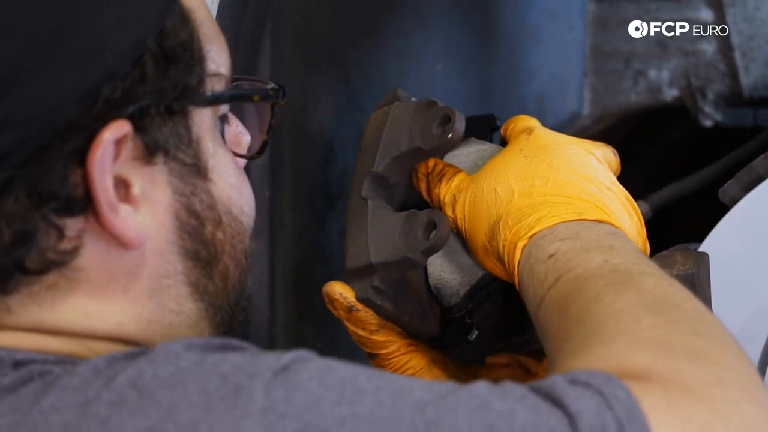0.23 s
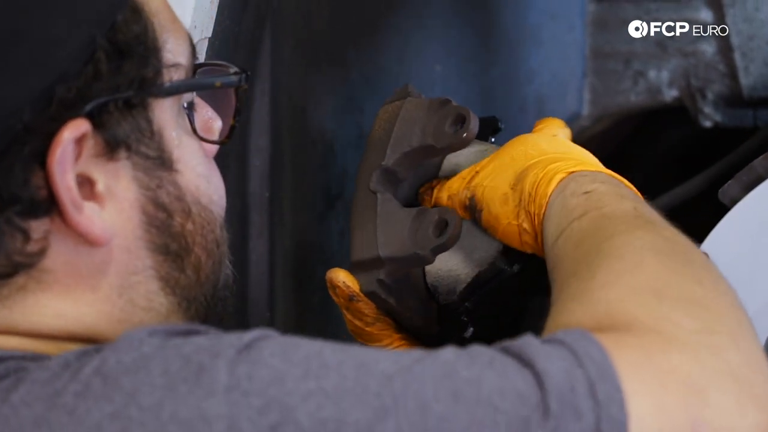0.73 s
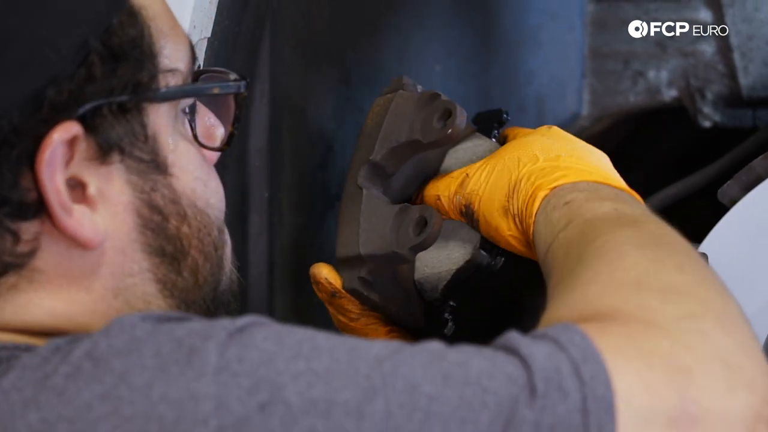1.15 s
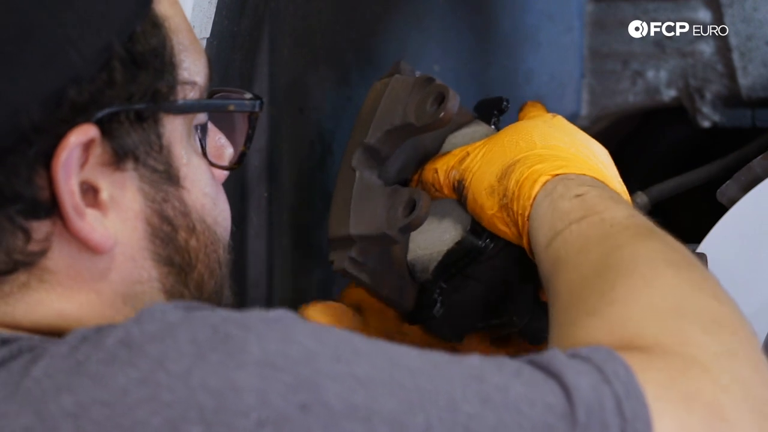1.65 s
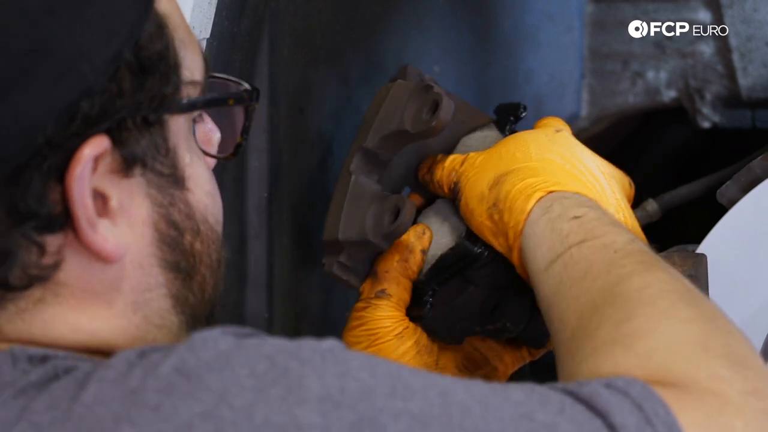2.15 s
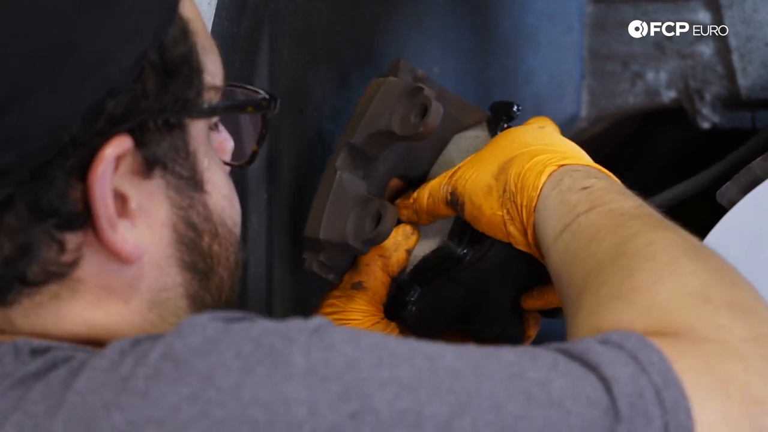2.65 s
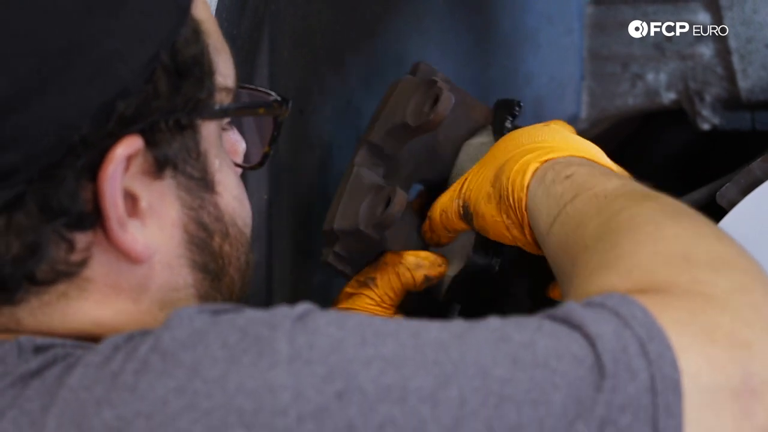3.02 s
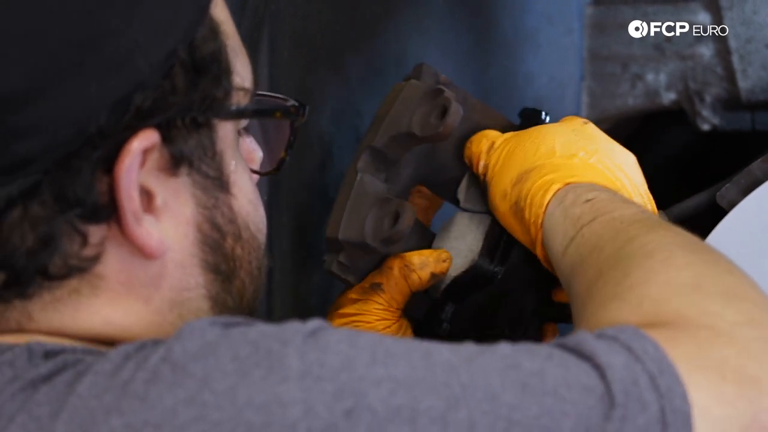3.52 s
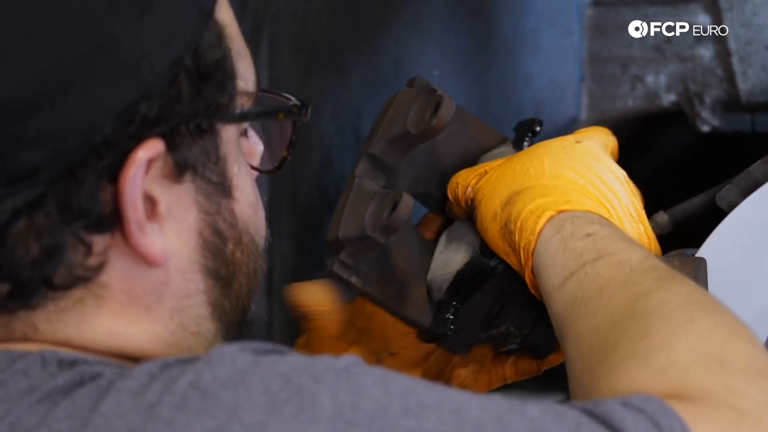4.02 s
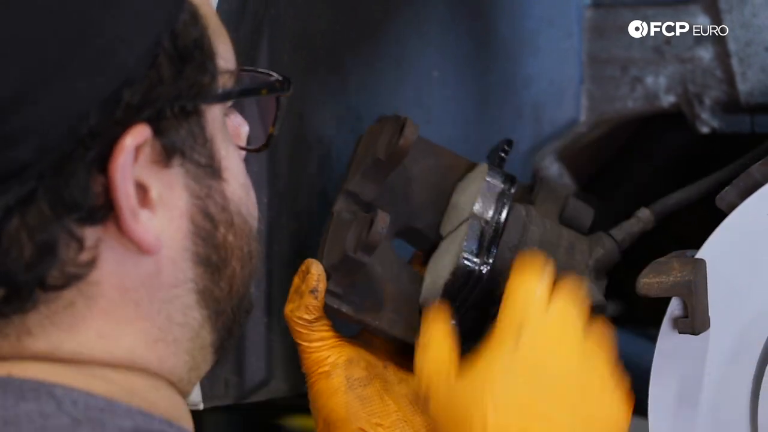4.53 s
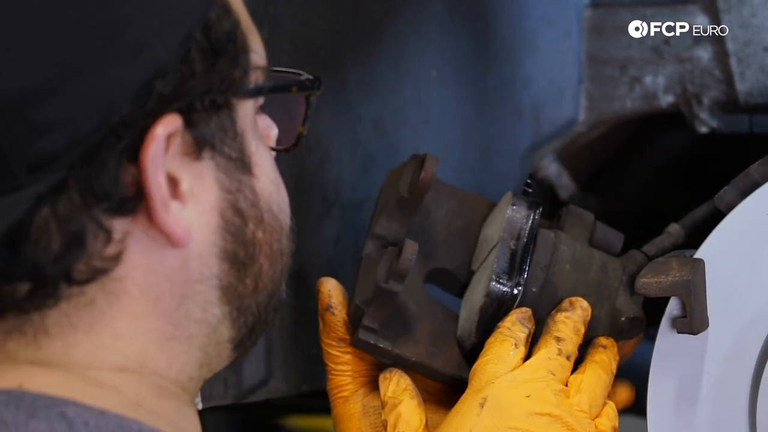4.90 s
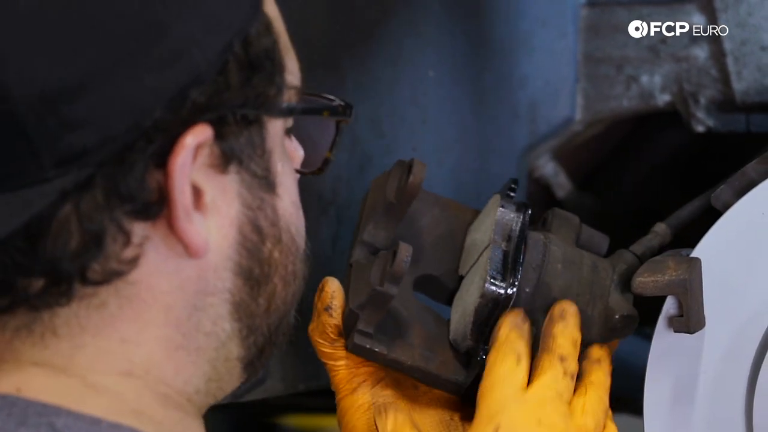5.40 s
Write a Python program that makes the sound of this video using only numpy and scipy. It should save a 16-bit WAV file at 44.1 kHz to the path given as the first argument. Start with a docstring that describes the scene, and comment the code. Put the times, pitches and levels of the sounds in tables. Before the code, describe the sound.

Gloved hands fit a brake pad into a caliper, heard close and mostly dry. Opening double clack, faint ticks, a short fading rattle, scrapey knocks, then a very loud sharp snap and a second, duller one. Afterwards faint glove rustle and small clicks over a very low rumble and soft room noise.

```python
"""Brake pad into a caliper, quiet garage

Gloved hands work a steel brake pad into a cast caliper; the work sounds close, the garage faint around it.
The backing plate knocks and chatters on the casting and the spring clip snaps home twice: bursts of
micro-bounces strike decaying modes. Gloves and metal rub in short strokes of filtered grit; bumps are low
decaying sines. Shaped noise gives a low rumble and room noise, and a low sine climbs, holds and sinks."""
import sys
import numpy as np
from scipy import signal
from scipy.fft import rfft, irfft, next_fast_len
from scipy.io import wavfile

SR = 44100
rng = np.random.default_rng(int(sys.argv[2]) if len(sys.argv) > 2 else 0)


def transcribe(signal):
    """Save signal, clipped to [-1, 1], as a 16-bit WAV file at the path in sys.argv[1]."""
    frames = np.atleast_2d(signal).T
    limited = np.clip(frames, -1, 1)
    pcm = np.round(limited * 32767).astype(np.int16)
    wavfile.write(sys.argv[1], SR, pcm)


N = 249561

# room background: t/s, rumble level/dB, room noise level/dB
BACKGROUND = [(0.0, -67, -62.5), (0.31, -63.5, -72), (1.0, -70, -68.5), (1.37, -67, -71.5),
              (1.69, -64, -69), (2.13, -63, -67.5), (2.6, -71.5, -70), (3.04, -64.5, -70.5),
              (3.17, -82.5, -91.5), (3.39, -78.5, -76.5), (3.7, -78.5, -80.5), (3.86, -69.5, -72.5),
              (4.4, -66, -72.5), (5.03, -72.5, -73.5), (5.3, -75, -82), (5.66, -86, -88)]
# spectrum of the low rumble: f/Hz, relative level per Hz/dB
RUMBLE_SPECTRUM = [(12, -56), (20, -34), (27, -24), (35, -14.5), (46, -10), (75, -1), (95, 0), (156, -10),
                   (220, -33), (290, -45), (480, -120)]
# spectrum of the room noise: f/Hz, relative level per Hz/dB
ROOM_NOISE_SPECTRUM = [(88, -33.5), (150, -4.5), (259, -3.5), (361, -1.5), (649, -7), (821, -14),
                       (1080, -10), (1870, -16.5), (6510, -29), (14000, -24.5), (16000, -33)]
# faint narrow hisses: f/Hz, level over the room noise/dB
AIRY_BANDS = [(2000, -20.5), (3280, -27)]
# a low tone, perhaps a distant engine: t/s, f/Hz, level/dB
HUM = [(0, 54.9, -79), (.8, 56.6, -74), (1.5, 63.26, -69), (1.95, 71.4, -72), (2.25, 84.1, -62.5),
       (2.5, 86.1, -63.5), (2.92, 86.6, -58.5), (3.04, 87.1, -77), (3.8, 78.86, -79), (4.45, 67.3, -61.5),
       (5.0, 64.83, -80.5), (5.66, 61.84, -94)]
# metal on metal: t/s, plate peak level/dB, casting f/Hz, casting peak level/dB, clip f/Hz, clip peak level/dB,
# edge peak level/dB, chatter decay/ms, slide-in/ms (below one slide step: none)
CONTACTS = [(0.002, -18.5, 1250, -28.5, 2790, -27, -21.5, 5.5, -2.5),
            (0.0388, -24.5, 1170, -32.5, 3510, -28, -24.5, 2.46, 0),
            (0.164, -62, 1270, -70, 2600, -39, -29.5, 3.6, 0),
            (0.452, -39.5, 1255, -44, 2640, -34, -38.5, 6.1, 0),
            (0.48, -49, 1060, -43.5, 2770, -47, -62, 5.5, 0),
            (0.521, -51, 1120, -55.5, 4470, -49.5, -50, 2.2, 0),
            (0.846, -56, 1030, -50, 3020, -54, -54, 0.96, 0),
            (0.867, -36.5, 1160, -40.5, 2950, -32.5, -47, 1.2, 0),
            (0.963, -70, 1130, -51, 2870, -70, -43, 2.1, 0),
            (1.001, -39.5, 1336, -46.5, 2930, -43, -51.5, 10.4, 0),
            (1.1175, -26.5, 1068, -40, 2760, -40, -35, 3.3, -2),
            (1.652, -49.5, 1310, -48.5, 3420, -46.5, -30.5, 3.8, 0),
            (1.772, -94, 900, -80, 3000, -57, -53, 3, 0),
            (1.879, -84, 1110, -80, 3260, -43.5, -49.5, 8.3, 0),
            (1.9495, -32, 1122, -30.5, 3620, -44.5, -69, 0.86, 11),
            (2.0785, -28, 1100, -40.5, 2850, -38, -32, 3.9, 9),
            (2.4495, -19, 874, -34.5, 3000, -32.5, -25.5, 6, 7),
            (3.0505, -4.5, 991, -15.5, 3515, -11.5, -8.5, 3, 13),
            (3.055, -13.5, 912, -12.5, 3454, -2, -18.5, 1.3, 0),
            (3.273, -51, 1009, -57, 3150, -66.5, -72, 2.6, -2.5),
            (3.461, -20, 924, -45, 2910, -39, -27, 2.8, 21),
            (3.469, -9, 618, -15.5, 4010, -11.5, -21.5, 3.5, -29),
            (4.055, -76, 550, -69, 2960, -43.5, -49, 2.1, 0.5),
            (4.345, -65, 1330, -76, 2637, -71, -45, 2.8, 0), (4.432, -69, 570, -71, 2813, -73, -43, 2.8, 0),
            (4.731, -68, 908, -66.5, 4376, -58, -47.5, 1.87, 0),
            (4.866, -67, 1090, -74, 3940, -73, -47.5, 4.4, 0),
            (5.089, -50, 1162, -72, 2720, -44, -54, 2.4, 0),
            (5.355, -67.5, 594, -85, 2710, -85, -90, 1.5, 0),
            (5.533, -70.5, 597.5, -70, 2584, -68, -81, 1, 0)]
# first touch of the loose pad rattling: plate peak level/dB, casting f/Hz, casting peak level/dB, clip f/Hz,
# clip peak level/dB, edge peak level/dB, chatter decay/ms
RATTLE = (-43, 1106, -44, 2692, -43, -54, 4.5)
# modes of the backing plate, held by the glove, one free mode ringing on: f/Hz, relative level/dB, t60/s
PLATE_MODES = [(1620, -9, 0.041), (1806.4, 0.5, 0.024), (1885, 8, 0.037), (2030, -2.5, 0.03),
               (2190, -1, 0.025), (2323, -8.5, 0.075), (1930, -34.5, 0.68)]
# modes of thin edges and clip fingers: f/Hz, relative level/dB, t60/s
EDGE_MODES = [(6730, -11, 0.01), (7600, -5.5, 0.0093), (8176, -4.5, 0.0053), (8750, 0.5, 0.0054),
              (9660, -3.5, .012), (10650, -6.5, 0.015), (11020, -8, .012), (12320, -3.5, 0.0068),
              (12460, 2, 0.0049), (13300, -4.5, 0.019), (12400, -4, 0.0048), (15100, -2.5, 0.016),
              (15550, -5.5, 0.0065), (14830, -3, .01)]
# modes around the casting's pitch: pitch ratio, relative level/dB, t60 in full ring/s
CASTING_MODES = [(1.0, -0.5, 0.067), (1.7, -5.5, 0.032), (1.01, -30, 0.22)]
CLIP_MODES = [(1.0, 5.5, 0.012), (1.12, -1, 0.011), (1.0, -27, 0.42), (1.15, -27, 0.17)]
# rubbing strokes: start t/s, length/ms, metal scrape level/dB, scrape f/Hz, glove rustle level/dB
STROKES = [(0.011, 75, -55.5, 1960, -52), (0.156, 47, -58, 2590, -43.5), (0.455, 170, -70, 3300, -57),
           (0.629, 158, -77, 3000, -58), (0.769, 110, -79.5, 2800, -69), (0.835, 103, -60.5, 2750, -45.5),
           (.925, 140, -76, 2630, -64), (1.119, 151, -69, 2560, -66.5), (1.231, 140, -92, 2100, -72),
           (1.371, 60, -91, 2500, -70), (1.631, 104, -65.5, 2300, -48.5), (1.64, 73, -60, 706, -80),
           (1.766, 102, -69, 2540, -61), (1.862, 106, -67, 3330, -59), (1.942, 144, -56, 3080, -49.5),
           (2.066, 74, -63.5, 2420, -58.5), (2.197, 13, -74, 2430, -67), (2.235, 79, -70, 1200, -87),
           (2.45, 76, -64, 2200, -60), (2.63, 155, -70, 3330, -54), (2.839, 99, -77, 3000, -56),
           (3.033, 43, -29, 2503, -25.5), (3.276, 53.5, -77.5, 3100, -54.5), (3.436, 89, -45, 2190, -49),
           (3.675, 83, -82.5, 2010, -65.5), (3.80, 92, -89, 1997, -69.5), (3.945, 96, -71, 1051, -87),
           (3.99, 180, -71, 2950, -53.5), (4.085, 60, -73, 2800, -87), (4.18, 213, -86, 2670, -68),
           (4.225, 45, -75, 2693, -72), (4.28, 81, -78, 2800, -83), (4.335, 66, -78, 4940, -57.5),
           (4.418, 92, -75.5, 5310, -53), (4.471, 135, -86.5, 4500, -60), (4.704, 154, -78, 4500, -60),
           (4.85, 73, -66.5, 4704, -62.5), (4.901, 286, -80, 4400, -85.5), (5.035, 160, -65, 2186, -66),
           (5.05, 121, -61.5, 4790, -73)]
# spectrum of metal scraping: f/Hz, relative level per Hz/dB
SCRAPE_SPECTRUM = [(410, -55.5), (700, -15), (1410, -13.5), (1670, -10.5), (2000, 2.5), (2400, -0.5),
                   (2650, -1), (4720, -10.5), (7000, -17), (9100, -52), (15400, -120)]
# spectrum of rustling gloves: f/Hz, relative level per Hz/dB
RUSTLE_SPECTRUM = [(2650, -18), (4500, -14.5), (5120, -19), (6870, -4.5), (7940, -4), (10000, -1),
                   (11500, 3.5), (15100, -5.5), (16200, -15)]
# decay of the garage: f/Hz, t60/s
GARAGE_T60 = [(300, 0.13), (1000, 0.55), (2000, 0.34), (4000, 0.25), (6000, 0.15), (14000, 0.093)]
# dull bumps of the caliper in the hand: t/s, level before the start is rounded/dB, f/Hz, t60/s
BUMPS = [(1.652, -35, 440, 0.01), (1.666, -42, 242, 0.039), (1.948, -36, 563, 0.017),
         (3.046, -30.5, 118.4, 0.041), (5.085, -47.5, 182, 0.09), (5.533, -47.5, 286, 0.044)]

WHINE_HZ, WHINE_DB = 349, -12.5  # a faint steady tone, peak over the room noise
# sliding in, the plate touches at even steps before the blow, each touch louder
SLIDE_STEP_MS, SLIDE_GAIN_DB, SLIDE_CHATTER_MS = 5, 6.5, 3.3
SLIDE_CASTING_HZ, SLIDE_CLIP_HZ = 1213, 2770
RATTLE_S, RATTLE_STEP_MS, RATTLE_LOSS_DB = 1.135, 13, 4
# after a light touch the plate rests on the casting and shortens its ring to this share
LIGHT_DB, LIGHT_RING, HARD_DB = -28.5, 0.58, -11
FOLLOW_S, DAMPING_MS = 0.012, 3.9  # a touch this soon after stops the light parts, with this time constant
CROWD_HZ, CLIP_CROWD_HZ = 70, 1000  # spread of the close neighbours around each long mode
BROAD_HZ = 2300  # rubs pitched below this carry less broad scrape
GARAGE_DB = -47
LIMIT, CUTOFF_HZ = 0.8, 16450  # full-scale share where peaks flatten; edge of the cut top, 50 dB down


def amp(db):
    """Gain of a level in dB."""
    return 10 ** (np.asarray(db) / 20)


def rms_one(x):
    """Scaled to rms 1."""
    return x / np.sqrt(np.mean(x ** 2) + 1e-20)


def in_time(rows):
    """Table columns after the time, one value a sample."""
    s, *columns = np.transpose(rows)
    return [np.interp(np.arange(N) / SR, s, column) for column in columns]


def at_hz(points, hz):
    """A spectrum read on a log frequency axis."""
    table_hz, values = np.array(points).T
    return np.interp(np.log(hz + 1), np.log(table_hz), values)


def colour(x, spectrum):
    """Shaped by a spectrum, rms 1."""
    size = next_fast_len(N)
    gain = amp(at_hz(spectrum, np.fft.rfftfreq(size, 1 / SR)))
    return rms_one(irfft(rfft(x, size) * gain, size)[:N])


def band(x, low_hz, high_hz):
    """Band-pass."""
    return signal.sosfilt(signal.butter(2, [low_hz, high_hz], "band", fs=SR, output="sos"), x)


def drift(rate):
    """Slow chance with rms 1, joining random points at a rate per second."""
    knots = rng.standard_normal(N // 100 + 2)
    return rms_one(np.interp(np.arange(N) / SR * rate, np.arange(len(knots)), knots))


def mode(hz, t60, size=14000):
    """One resonance: a sine of starting height 1 that decays 60 dB in t60 seconds."""
    t = np.arange(size) / SR
    return np.sin(2 * np.pi * hz * t) * amp(-60 * t / t60)


def add(out, s, sound):
    """Mixes a sound in at a time in seconds."""
    at = max(round(s * SR), 0)
    out[at:at + len(sound)] += sound[:N - at]


def background():
    """Lumpy low rumble under smooth room noise, with a faint whine and narrow hisses."""
    rumble_db, noise_db = in_time(BACKGROUND)
    rumble = amp(rumble_db + 0.5 * drift(24)) * colour(rng.standard_normal(N), RUMBLE_SPECTRUM)
    whine = amp(WHINE_DB) * np.sin(2 * np.pi * WHINE_HZ * np.arange(N) / SR)
    air = rng.standard_normal(N)
    hisses = sum(amp(db) * rms_one(band(air, hz * 0.975, hz * 1.025)) for hz, db in AIRY_BANDS)
    room_noise = colour(rng.standard_normal(N), ROOM_NOISE_SPECTRUM)
    return rumble + amp(noise_db) * (room_noise + whine + hisses)


def hum():
    """One low sine of gliding pitch and wavering level."""
    hz, db = in_time(HUM)
    sine = np.sin(2 * np.pi * np.cumsum(hz) / SR)
    return np.sqrt(2) * amp(db + 0.76 * drift(26)) * sine


def touches():
    """Every touch in time order: the blows, the steps that slide into them, the rattle."""
    rows = []
    for *blow, slide_ms in CONTACTS:
        s, plate_db, _, cast_db, _, clip_db, edge_db, _ = blow
        rows.append(tuple(blow))
        for k in range(1, int(slide_ms / SLIDE_STEP_MS) + 1):
            loss = k * SLIDE_GAIN_DB
            rows.append((s - k * SLIDE_STEP_MS / 1000, plate_db - loss, SLIDE_CASTING_HZ, cast_db - loss,
                         SLIDE_CLIP_HZ, clip_db - loss, edge_db - loss, SLIDE_CHATTER_MS))
    plate_db, cast_hz, cast_db, clip_hz, clip_db, edge_db, chatter_ms = RATTLE
    for k in range(5):
        loss = k * RATTLE_LOSS_DB
        late = (k - 0.152 * (k % 2)) * RATTLE_STEP_MS / 1000  # every other touch comes a little early
        rows.append((RATTLE_S + late, plate_db - loss, cast_hz, cast_db - loss,
                     clip_hz, clip_db - loss, edge_db - loss, chatter_ms))
    return sorted(rows)


def beating(crowd_hz, count):
    """Uneven swells, as many close modes make together."""
    knots = rng.standard_normal((count, 700))
    return [np.interp(np.arange(14000) / SR * crowd_hz, np.arange(700), row) for row in knots]


def body(modes, beats, pitch_hz=1, ring=1):
    """One ringing row for each mode; long ones stand for crowds of close modes, so they beat unevenly."""
    rows = []
    for (ratio, db, t60), beat in zip(modes, beats):
        hz = pitch_hz * ratio
        sound = mode(hz, t60) * beat if t60 > 0.12 else mode(hz, t60 * ring)
        rows.append(amp(db) * sound)
    return np.array(rows)


def micro_bounces(chance, size, chatter_ms):
    """Sparse random impulses that swell then die, with one sure blow near the start."""
    t_ms = np.arange(1200) / SR * 1000
    swell = np.exp(-t_ms / max(chatter_ms, 0.2)) * (1 - np.exp(-t_ms / 0.34))
    bounces = 0.83 * size * (np.abs(chance) > 1.5) * swell
    bounces[20] = 1.5
    return bounces


def contacts():
    """Each contact is a quick run of micro-bounces that strikes plate, edges, clip and casting."""
    out = np.zeros(N)
    beats = beating(CROWD_HZ, count=len(EDGE_MODES))
    wash = beating(CLIP_CROWD_HZ, count=len(CLIP_MODES))
    plate, edges = body(PLATE_MODES, beats), body(EDGE_MODES, beats)[:, :3000]
    rows = touches()
    luck = rng.standard_normal((len(rows), 4, 1200))
    gaps = np.diff([row[0] for row in rows], append=9)
    for row, z, gap in zip(rows, luck, gaps):
        s, plate_db, cast_hz, cast_db, clip_hz, clip_db, edge_db, chatter_ms = row
        bounces = micro_bounces(z[1], z[0], chatter_ms)
        ring = np.interp(cast_db, [LIGHT_DB, HARD_DB], [LIGHT_RING, 1])
        # where the blow lands sets a new strength for every plate and edge mode
        plate_gains = amp(3 * z[2, :len(plate)])
        edge_gains = amp(3.5 * z[3, :len(edges)]) * np.sign(z[2, -len(edges):])
        # small parts radiate only near their own pitch
        plate_ring = band(plate_gains @ plate, 1200, 3700)
        edge_ring = band(edge_gains @ edges, 4500, 15500)
        clip_ring = band(body(CLIP_MODES, wash, clip_hz).sum(axis=0), clip_hz * 0.3, clip_hz * 2.2)
        cast_ring = body(CASTING_MODES, beats[1:], cast_hz, ring).sum(axis=0)
        cast_ring = band(band(cast_ring, cast_hz * 0.75, cast_hz * 1.2), cast_hz * 0.59, cast_hz * 3.0)
        parts = [(plate_ring, plate_db, True), (edge_ring, edge_db, True),
                 (clip_ring, clip_db, True), (cast_ring, cast_db, False)]
        for part, db, light in parts:
            rung = signal.fftconvolve(bounces, part)
            if light and gap < FOLLOW_S:
                since_next = np.maximum(np.arange(len(rung)) / SR - gap, 0)
                rung = rung * np.exp(-since_next * 1000 / DAMPING_MS)
            add(out, s, amp(db) * rung / np.abs(rung).max())
    return out


def grit(per_s, spread_db):
    """Dense stick-slip grains of uneven size and random sign."""
    hits = rng.random(N) < per_s / SR
    sizes = amp(spread_db * np.minimum(rng.exponential(1, N), 5))
    return hits * sizes * rng.choice([-1, 1], N)


def glove_rustle():
    """Bright grit of rubber gloves whose folds flicker in colour and level."""
    rustle = colour(grit(6600, spread_db=3.0), RUSTLE_SPECTRUM)
    folds_hz = [(3000, 7000), (7000, 9500), (9500, 12500), (12500, 17500)]
    rustle = sum(amp(1.8 * drift(45)) * band(rustle, *fold) for fold in folds_hz)
    return amp(3 * drift(110)) * rustle


def rubs():
    """Gritty friction in strokes that swell fast and stop: duller for metal, bright for the gloves."""
    out = np.zeros(N)
    grains, flicker = grit(3500, spread_db=1.5), amp(2.4 * drift(170))
    scrape, grains = flicker * colour(grains, SCRAPE_SPECTRUM), flicker * grains
    rustle = glove_rustle()
    for s, length_ms, scrape_db, hz, rustle_db in STROKES:
        at, size = round(s * SR), round(length_ms * SR / 1000)
        stroke = slice(at, at + size)
        phase = np.arange(len(out[stroke])) / size
        swell = np.sin(np.pi * phase ** 0.58) ** 2.0
        # the rubbed part colours the grit
        tuned = band(band(grains[stroke], hz * 0.8, hz * 1.25), hz * 0.7, hz * 1.4)
        broad = 1.2 * min(hz / BROAD_HZ, 1) ** 2 * scrape[stroke]
        metal = rms_one(tuned) + broad
        add(out, s, swell * (amp(scrape_db) * metal + amp(rustle_db) * rustle[stroke]))
    return out


def garage(x):
    """Reverberation: two dozen feedback delays whose loss follows the decay table."""
    size = next_fast_len(N + SR)
    hz = np.fft.rfftfreq(size, 1 / SR)
    t60, walls = np.maximum(at_hz(GARAGE_T60, hz), 0.03), 0
    for k, lag_s in enumerate(rng.uniform(0.0095, 0.032, 24)):
        trip = amp(-60 * lag_s / t60) * np.exp(-2j * np.pi * hz * lag_s)
        walls = walls + (-1) ** k * trip / (1 - trip)  # the sum of all round trips
    return irfft(rfft(x, size) * walls, size)[:N]


def bumps():
    """Soft low thuds: single decaying modes with a rounded start."""
    out = np.zeros(N)
    rounded = 1 - np.exp(-np.arange(12000) / SR / 0.003)
    for s, db, hz, t60 in BUMPS:
        add(out, s, amp(db) * mode(hz, t60, size=12000) * rounded)
    return out


def scene():
    """Work at the caliper, its reverberation, the background and the hum."""
    work = contacts() + rubs() + bumps()
    return (work + amp(GARAGE_DB) * garage(work) + background() + hum())[None]


def record(dry):
    """At the microphone, peaks are rounded and the top is cut."""
    rounded = LIMIT * np.tanh(dry / LIMIT)
    return signal.sosfilt(signal.cheby2(12, 50, CUTOFF_HZ, fs=SR, output="sos"), rounded)


dry = scene()
out = record(dry)
transcribe(out)
```